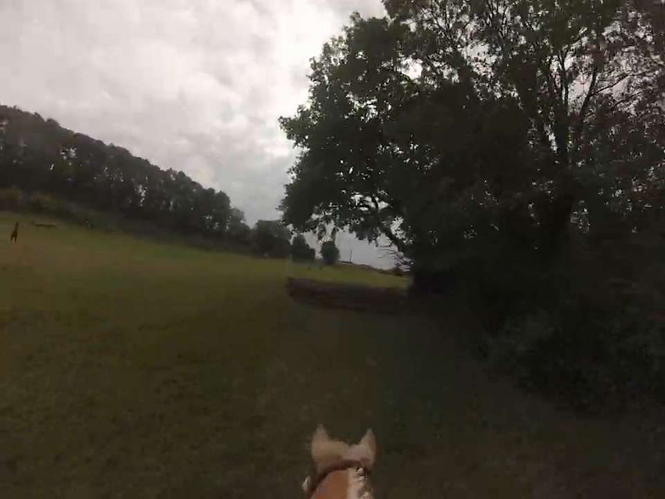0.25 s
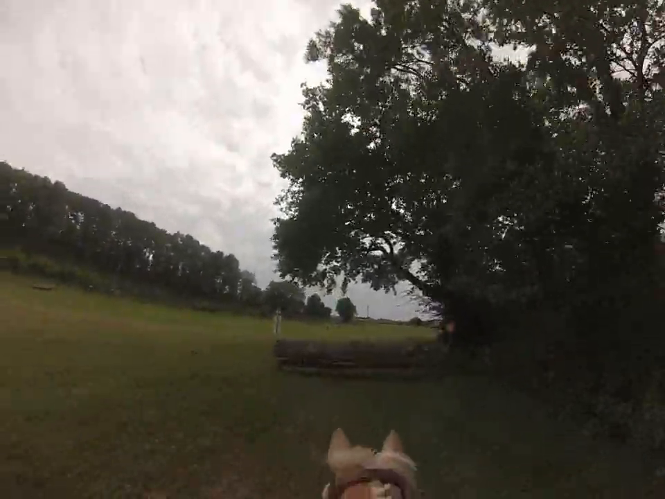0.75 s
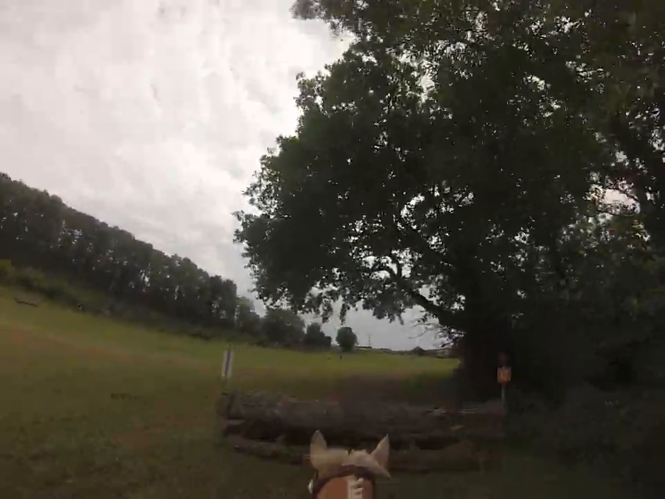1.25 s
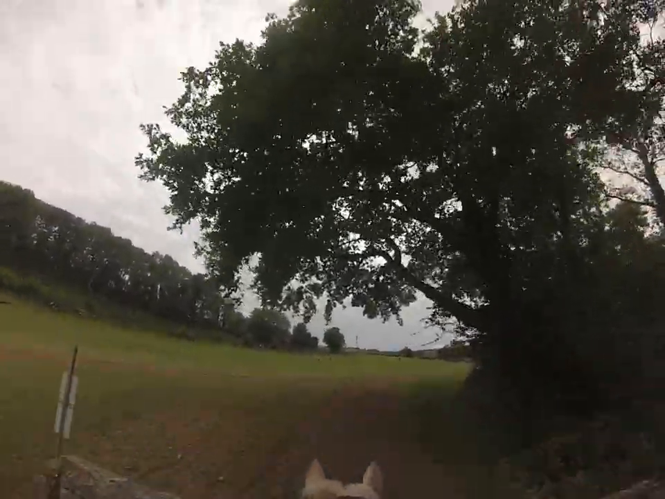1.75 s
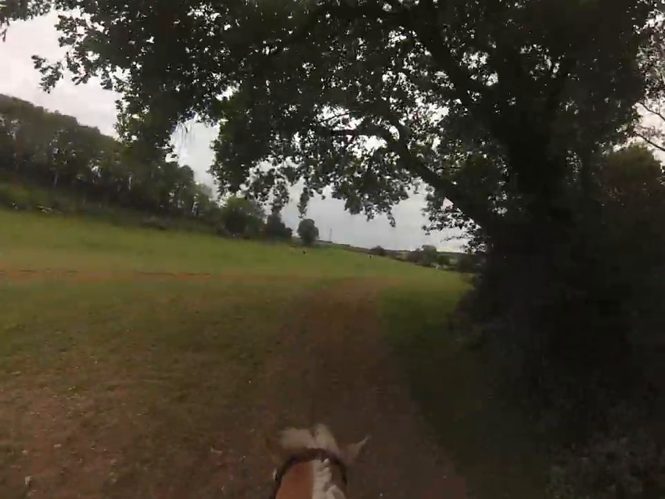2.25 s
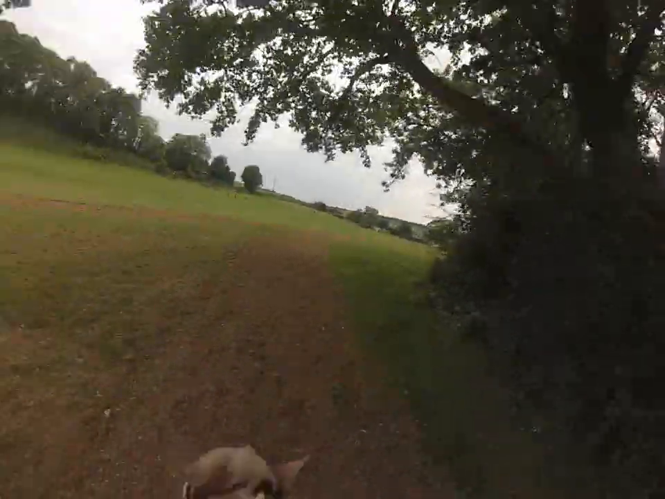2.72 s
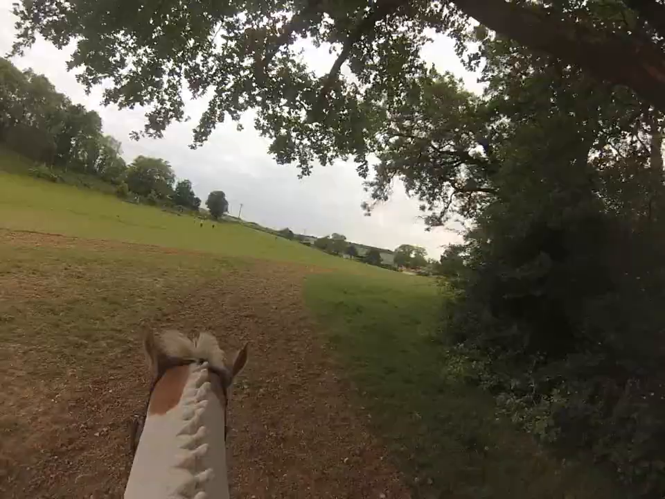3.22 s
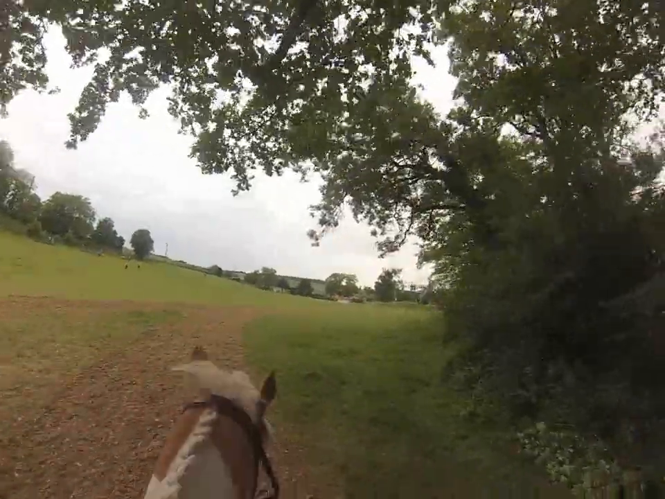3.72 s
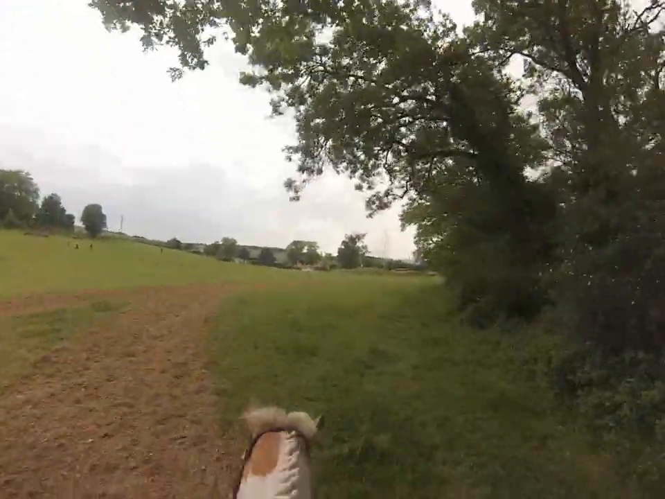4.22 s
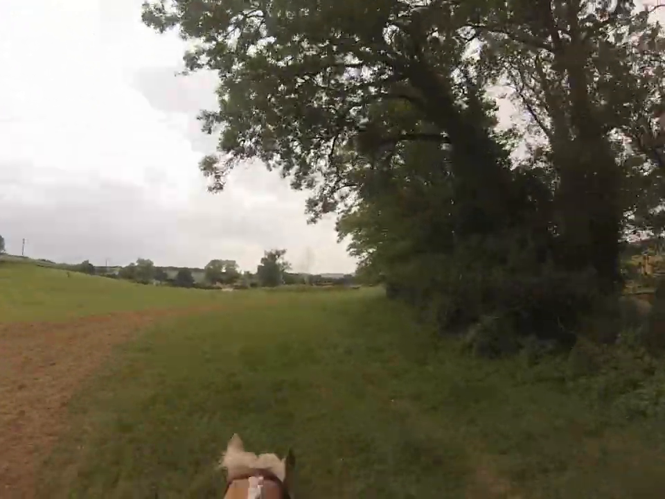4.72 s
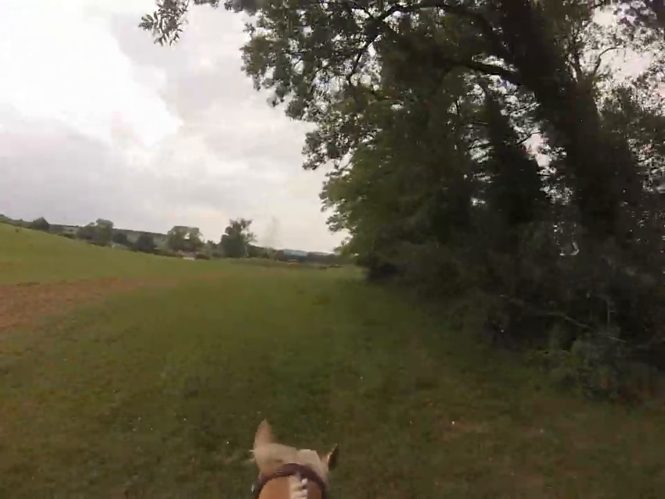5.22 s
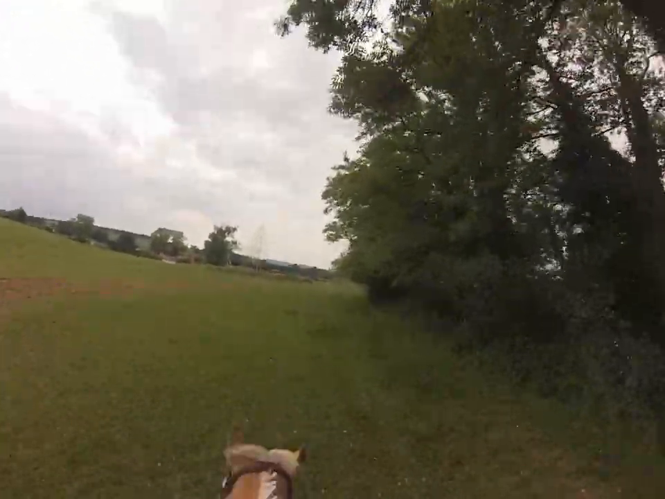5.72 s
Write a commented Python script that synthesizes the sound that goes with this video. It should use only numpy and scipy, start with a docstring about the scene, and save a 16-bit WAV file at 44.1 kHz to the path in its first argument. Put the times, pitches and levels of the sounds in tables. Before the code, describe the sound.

A horse jumps and gallops on over turf: dull uneven thuds, tack ticks, deep wobbling rumble and boxy wind noise, heard from a helmet camera.

```python
"""Turf with a log to jump: a galloping horse, heard from a small closed camera worn on the rider's helmet.
The mount wobbles as one low wandering tone, and wind buffets and roars as noise in two housing colours.
Dull thuds are damped tones with a crunch of small shocks; knocks on the helmet ring the housing modes.
Tack ticks as bright snaps and squeaks twice by stick and slip; the housing briefly whistles.
The microphone dulls the top and the recorder lays a faint hiss under everything."""
import sys
import numpy as np
from scipy import signal
from scipy.fft import rfft, irfft
from scipy.io import wavfile

SR = 44100
rng = np.random.default_rng(int(sys.argv[2]) if len(sys.argv) > 2 else 0)


def generate_wav(signal):
    """Clip the signal to [-1, 1] and save it as 16-bit WAV at the path in sys.argv[1]."""
    frames = np.transpose(np.atleast_2d(signal))
    scaled = np.clip(frames, -1, 1) * 32767
    pcm = np.round(scaled).astype(np.int16)
    wavfile.write(sys.argv[1], SR, pcm)


N = 262832

# swing of the camera mount between jolts: (time [s], level [dB], pitch [Hz])
MOUNT_SWING = [(0.0, -42.5, 46.8), (0.35, -46.5, 43.6), (0.64, -44.5, 45.16), (0.8, -45, 38.14),
               (1.08, -50.5, 39.2), (1.38, -46.5, 39.47), (1.6, -41, 38.8), (1.82, -40.5, 40.3),
               (2.05, -43, 33.67), (2.38, -52.5, 34.22), (2.65, -41.5, 33.34), (2.9, -39.5, 41.17),
               (3.15, -59, 42.87), (3.42, -47, 40.45), (3.85, -46, 36.07), (4.1, -46.5, 35.97),
               (4.45, -50, 41.6), (4.7, -42.5, 44.5), (5.05, -51, 33.8), (5.4, -50, 42.45),
               (5.65, -55, 42.7), (5.96, -51, 43)]
# jolts that set the mount ringing: (time of peak [s], peak level [dB], rise [s])
MOUNT_JOLTS = [(0.1, -57, 0.038), (0.33, -43.5, 0.017), (0.46, -49, 0.023), (0.75, -42.5, 0.037),
               (0.82, -46, 0.016), (0.9, -37, .02), (0.955, -41.5, .025), (1.28, -43.5, 0.038),
               (1.41, -34, .03), (1.71, -47, .025), (1.79, -34, 0.032), (1.87, -45, 0.038),
               (1.962, -33.5, 0.0083), (2.17, -39.5, 0.027), (2.46, -52, 0.013), (2.6, -39, 0.023),
               (2.69, -35, 0.019), (2.785, -24, 0.017), (3.019, -37.5, 0.049), (3.32, -37, 0.073),
               (3.5, -34, 0.016), (3.66, -35, 0.012), (3.73, -37, .02), (3.83, -37, 0.047),
               (3.919, -37, 0.016), (4.14, -42.5, 0.018), (4.243, -20, 0.017), (4.35, -17, 0.016),
               (4.44, -39.5, 0.018), (4.6, -70, 0.023), (4.89, -38.5, 0.029), (5.392, -31.5, 0.029),
               (5.69, -49, 0.021), (5.839, -41.5, 0.019)]
# colour of the irregular sway of the mount: (frequency [Hz], level [dB])
SWAY_COLOUR = [(8, -23), (16, 20.5), (30, 5.5), (55, -7.0), (90, -77), (200, -120)]
# wind on the housing, before its flutter: (time [s], buffeting level [dB], roar level [dB])
WIND_LEVELS = [(0.0, -49, -57), (0.2, -56, -59.5), (0.63, -55.5, -56), (1.0, -61.5, -67),
               (1.12, -57.5, -57.5), (1.27, -58.5, -60), (1.52, -58.5, -63.5), (1.8, -59, -59),
               (2.0, -58.5, -64), (2.14, -57.5, -61.5), (2.33, -59, -67), (2.45, -49.5, -59),
               (2.72, -51.5, -57.5), (2.88, -59.5, -68), (3.15, -57.5, -65.5), (3.33, -57.5, -64),
               (3.48, -55.5, -70), (3.62, -55, -59), (3.82, -57, -57.5), (3.97, -53, -60.5),
               (4.18, -53, -52.5), (4.3, -54.5, -60), (4.62, -52, -52.5), (4.95, -52, -57), (5.1, -49, -54),
               (5.3, -53, -55.5), (5.52, -48, -53), (5.96, -49.5, -53.5)]
# colour of the buffeting, below the dip of the housing: (frequency [Hz], relative level [dB per Hz])
BUFFET_COLOUR = [(10, -8.5), (45, 2.5), (75, -1.5), (110, -2), (165, 2), (230, -5), (320, -10.5),
                 (450, -15.5), (600, -18.5), (770, -14), (900, -23), (1050, -64), (1300, -115),
                 (3000, -130)]
# colour of the roar, above the dip: (frequency [Hz], relative level [dB per Hz])
ROAR_COLOUR = [(600, -22), (1050, -16.5), (1280, -8.5), (1420, 0), (1650, -5), (2100, -5.5), (2500, -8.5),
               (2900, -20), (3100, -18.5), (3600, -25), (3850, -23), (5000, -27.5), (5600, -31.5),
               (8000, -39.5), (12000, -46)]
# colour of the recorder's hiss: (frequency [Hz], relative level [dB per Hz])
HISS_COLOUR = [(500, 1.5), (3000, -16.5), (8000, -18.5), (12400, -21), (12900, -26), (15000, -51)]
# response of the microphone: (frequency [Hz], level [dB])
MICROPHONE_RESPONSE = [(20, -3.5), (11000, -3), (13000, -9.5), (15000, -13)]
# hoofbeats and jolts of the stride: (time [s], level [dB], thud pitch [Hz], crunch length [s],
# crunch level against the thud [dB], upper housing modes against the lower [dB])
BLOWS = [(0.253, -41.5, 227, 0.019, 2.5, -9), (0.287, -43, 435, 0.015, 4, -12.5),
         (1.578, -49, 169, 0.028, -10, 1.5), (1.621, -42.5, 168, 0.037, -19, -13),
         (1.755, -52, 169.2, 0.018, 0.5, -9), (1.826, -40, 111, 0.037, -11, -2),
         (2.041, -45, 143.3, 0.057, -7.5, -10), (2.36, -44.5, 219, 0.043, -9, -13),
         (2.484, -41, 175, 0.023, -20, 0), (2.55, -43.5, 204, 0.027, -0.5, -4.5),
         (2.63, -38.5, 104.7, 0.022, -1, -5), (2.639, -35, 356.4, 0.022, -4.5, -6),
         (2.662, -38.5, 106, 0.0095, -21, -10), (2.987, -44.5, 189.5, 0.02, -10, -14),
         (3.19, -41, 188, 0.027, -8.5, -10), (3.296, -46.5, 125.4, 0.034, -2.5, -1.5),
         (3.349, -33.5, 172, 0.042, -9, -7.5), (3.393, -30, 99.5, 0.035, -9, -3),
         (3.42, -36.5, 162, 0.016, -3.5, -3), (3.431, -33.5, 137, 0.0076, -28, -16),
         (3.44, -53, 171.6, .012, -7, 13), (3.647, -36, 168, 0.031, -3.5, -8.5),
         (3.707, -33, 159, 0.022, -6.5, -3), (3.726, -32.5, 185, 0.028, -14.5, -5),
         (3.752, -38.5, 107, 0.037, -10.5, -1), (4.099, -30, 158, 0.025, -10, 0),
         (4.128, -51, 176.7, 0.012, -3, 3), (4.192, -52, 306, 0.011, -2, 8),
         (4.63, -39, 162.4, 0.02, -21, 8), (4.876, -45, 171, 0.017, 2, -10),
         (4.896, -36.5, 178.7, 0.0096, -9.5, -5), (5.06, -46.5, 163, 0.016, -11, 1),
         (5.195, -38.5, 169.6, 0.017, -21, -7), (5.37, -49.5, 172, 0.027, -2, -5),
         (5.469, -41, 123.2, 0.023, -10, -17), (5.823, -35, 142.6, 0.025, -6.5, -11),
         (5.897, -50, 140.4, 0.046, -20, -10)]
# further rings of every thud: (frequency [Hz], level against the first [dB])
THUD_UPPER_RINGS = [(345, -18.5), (450, -15.5), (545, -17.5)]
# modes of the camera housing: (frequency [Hz], width [Hz], level [dB])
HOUSING_MODES = [(169, 99, -1), (359, 145, -23), (442, 69, -1.5), (526, 290, -8.5), (787, 28, -8),
                 (1390, 46, -10.5), (1641, 97, 3.5), (2090, 280, -7), (2670, 700, -17), (3140, 260, -16.5),
                 (3760, 89, -17.5), (4990, 57, -19), (6740, 250, -37)]
# ticks of buckles and straps: (time [s], peak level [dB], centre [Hz], spread [octaves])
TACK_TICKS = [(0.6453, -48.5, 9300, 0.63), (0.7435, -53, 4300, 0.34), (0.776, -44, 10000, 0.42),
              (2.0732, -51, 9600, 0.55), (2.4513, -48, 5240, 0.47), (2.6743, -52, 6960, 0.6),
              (2.7352, -53, 6620, 0.74), (2.7689, -33.5, 9500, 1.4), (3.3746, -34, 9000, 0.65),
              (3.4397, -45, 8340, .72), (3.7727, -52.5, 7640, 0.73), (3.8407, -56, 6600, 1),
              (3.8616, -33.5, 10150, 1.1), (3.8885, -53, 8220, 1), (3.9188, -54, 6910, 0.83),
              (3.9231, -58, 6540, 1), (3.9269, -53, 7260, .9), (3.9332, -45, 7440, 1.3),
              (3.9969, -39, 7070, 1.27), (4.1608, -54, 7040, .9), (4.166, -50, 3397, 0.21),
              (4.2193, -38.5, 9100, 1.1), (4.3799, -41, 7730, .95), (4.7865, -58, 9750, .9),
              (5.3515, -53, 8010, 0.98), (5.5079, -60, 7080, 0.8)]
# sharp knocks on the helmet and mount:
# (time [s], push level [dB], push length [s], housing ring against the push [dB])
HELMET_KNOCKS = [(0.745, -45.5, 0.000075, -6), (1.437, -60, 0.00018, 12), (1.76, -39.5, 0.00031, -17),
                 (1.921, -50.5, 0.00017, 8), (1.98, -47.5, 0.00028, -6), (2.134, -43.5, 0.00028, -1),
                 (2.451, -46, 0.00019, -3), (2.73, -54, 0.000088, 5), (2.877, -50.5, 0.00008, 1),
                 (3.299, -54, .0002, 1), (3.425, -22.5, 0.00071, -4), (3.648, -28.5, 0.0013, -31),
                 (4.341, -34.5, 0.00019, -5.5)]
# brief faint whistles of the housing: (time of peak [s], peak level [dB], pitch [Hz], length [s])
HOUSING_WHISTLES = [(1.797, -53.5, 1600, 0.0083), (1.854, -48, 1720, 0.005), (4.111, -36, 1560, 0.0028)]
# squeaks of a strap, one list each: (time [s], level [dB], slip rate [Hz], roughness [0-1])
STRAP_SQUEAKS = [
    [(3.077, -64, 4400, .8), (3.086, -53, 4300, .75), (3.095, -50, 3900, .6), (3.106, -54, 2800, .65),
     (3.116, -55, 1700, .55), (3.131, -67, 1150, .5)],
    [(4.928, -66, 4400, .1), (4.9315, -57, 3950, .1), (4.938, -61, 3750, .1), (4.941, -57, 3300, .1),
     (4.945, -53, 3120, .1), (4.95, -56, 2980, .1), (4.956, -58, 2250, .15), (4.96, -64, 2000, .2)],
]
# overtones of the slips: (multiple of the slip rate, level [dB])
SLIP_OVERTONES = [(1, 8), (2, -7), (3, -10)]
# colour of the rasp of rough slips: (frequency [Hz], level [dB])
RASP_COLOUR = [(1000, -22), (1500, -3), (3000, 0), (4300, -2),
               (6000, -10), (8200, 4), (9800, -18), (13000, -12)]

SWING_LUMPS = 0.38  # unevenness of the swing, share of its size
JOLT_FALL = 1.08  # late in a jolt, time to ring down by 1/e, against the rise
# a blow shakes the housing in the wind: levels [dB] and length against its crunch
SHAKE_LOW_DB, SHAKE_HIGH_DB, SHAKE_STRETCH = 3.5, -4.5, 1.29
SHAKE_RISE_S, SHAKE_LEAD_S = 0.014, 0.0085  # softer than the crunch, and a little ahead
SPLIT_HZ = 1050  # dip between the lower and upper modes of the housing
TICK_S = 0.002  # time for the crackle to fall by 1/e on either side of the snap
HISS_DB, EDGE_HZ = -75.5, 15000  # recorder: hiss level before the band limit, and that limit


def gain_of(db):
    """Decibels to amplitude."""
    return 10 ** (np.asarray(db) / 20)


def evened(x):
    """Scales to rms 1."""
    return x / np.sqrt(np.mean(x ** 2) + 1e-20)


def columns(rows, t):
    """Every column after the time, read at the times t."""
    s, *values = np.transpose(rows)
    return [np.interp(t, s, v) for v in values]


def coloured(x, points):
    """Filters x by a (frequency [Hz], level [dB]) table, read along log frequency."""
    f, db = np.transpose(points)
    hz = np.fft.rfftfreq(len(x), 1 / SR)
    gain = gain_of(np.interp(np.log(hz + 1), np.log(f), db))
    return irfft(rfft(x) * gain, len(x))


def drift(hz, count=N):
    """Slow chance of rms 1, with changes up to about hz a second."""
    f = np.fft.rfftfreq(count, 1 / SR)
    lowpass = 1 / (1 + (f / hz) ** 4)
    return evened(irfft(rfft(rng.standard_normal(count)) * lowpass, count))


def add(mix, s, sound):
    """Mixes a sound in from time s."""
    part = mix[max(round(s * SR), 0):][:len(sound)]
    part += sound[:len(part)]


def wobble(unsteady_hz=4.85, sway=0.51):
    """The mount rings at one low wandering pitch, swelled by jolts; sway is the power share of slow noise."""
    t = np.arange(N) / SR
    db, hz = columns(MOUNT_SWING, t)
    swing = gain_of(db) * (1 + SWING_LUMPS * drift(11.7))
    jolts = np.zeros(N)
    for s, peak_db, rise in MOUNT_JOLTS:
        u = (t - s) / rise
        fall = np.hypot(1, u / JOLT_FALL) - 1
        jolt = gain_of(peak_db) * np.exp(-np.where(u < 0, u ** 2, fall))
        jolts = np.hypot(jolts, jolt)  # overlapping jolts add in power
    swing = swing + jolts
    turns = np.cumsum(hz + unsteady_hz * drift(19.4)) / SR
    ring = np.sqrt(2) * np.sin(2 * np.pi * turns)
    slow = evened(coloured(rng.standard_normal(N), SWAY_COLOUR))
    sway_size = np.minimum(swing, gain_of(-33))  # hard jolts feed the ring alone
    return np.sqrt(1 - sway) * swing * ring + np.sqrt(sway) * sway_size * slow


def turbulence():
    """Steady noise in the two colours of the housing."""
    low, high = rng.standard_normal((2, N))
    return evened(coloured(low, BUFFET_COLOUR)), evened(coloured(high, ROAR_COLOUR))


def crunches(stretch=1, rise_s=0.0038, lead_s=0):
    """Envelopes of the blows in the lower and upper modes: each holds, then stops quickly."""
    dull, bright = np.zeros(N), np.zeros(N)
    t = np.arange(SR // 6) / SR
    for s, db, _, length, crunch_db, upper_db in BLOWS:
        rise = 1 - np.exp(-t / rise_s)
        stop = np.exp(-(t / (stretch * length + lead_s)) ** 2)
        crunch = gain_of(db + crunch_db) * rise * stop
        add(dull, s - lead_s, crunch)
        add(bright, s - lead_s, crunch * gain_of(upper_db))
    return dull, bright


def wind():
    """Eddies flutter both colours together, each with lumps of its own; every blow adds a burst."""
    buffet_db, roar_db = columns(WIND_LEVELS, np.arange(N) / SR)
    dull, bright = crunches(SHAKE_STRETCH, SHAKE_RISE_S, SHAKE_LEAD_S)
    low = np.hypot(gain_of(buffet_db), gain_of(SHAKE_LOW_DB) * dull)
    high = np.hypot(gain_of(roar_db), gain_of(SHAKE_HIGH_DB) * bright)
    buffet, roar = turbulence()
    eddies = drift(61)
    # flutter in dB around a small trim
    low_flutter = gain_of(-1 + 1.88 * eddies + 0.48 * drift(25))
    high_flutter = gain_of(-2.5 + 0.82 * eddies + 0.5 * drift(130) + 1.0 * drift(12))
    return buffet * low * low_flutter + roar * high * high_flutter


def housing(x, upper=None):
    """Rings the damped modes of the housing, the upper ones from their own drive if given."""
    t = np.arange(2048) / SR
    modes = []
    for k, (hz, width, db) in enumerate(HOUSING_MODES):
        sign = (-1) ** k  # neighbours alternate
        decay = np.exp(-np.pi * width * t)
        modes.append(sign * gain_of(db) * width * decay * np.sin(2 * np.pi * hz * t))
    modes = np.array(modes)
    modes = modes / abs(modes.sum(axis=0)).max()
    high = np.array(HOUSING_MODES)[:, 0] > SPLIT_HZ
    upper = x if upper is None else upper
    low_ring = signal.oaconvolve(x, modes[~high].sum(axis=0))
    high_ring = signal.oaconvolve(upper, modes[high].sum(axis=0))
    return (low_ring + high_ring)[:len(x)]


def thuds(t60=0.14, grains_per_s=3000, spread_db=2.5):
    """Each blow is a few quickly damped rings and a clumpy crunch of small shocks through the housing."""
    ring, t = np.zeros(N), np.arange(SR // 8) / SR
    for s, db, hz, *_ in BLOWS:
        tones = np.sin(2 * np.pi * hz * t)
        for f, ring_db in THUD_UPPER_RINGS:
            tones = tones + gain_of(ring_db) * np.sin(2 * np.pi * f * t)
        onset = 1 - np.exp(-t / 0.0015)
        add(ring, s, gain_of(db - 60 * t / t60) * onset * tones)
    dull, bright = crunches()
    shocks = (rng.random(N) < grains_per_s / SR) * rng.standard_normal(N)
    grains = shocks * gain_of(spread_db * drift(63))
    return ring + housing(dull * grains, bright * grains) / np.std(housing(grains))


def ticks(snap=9):
    """One bright snap inside a very short crackle, broad around its centre."""
    out, t, hz = np.zeros(N), np.arange(-256, 768) / SR, np.fft.rfftfreq(1024, 1 / SR)
    noise = rng.standard_normal((len(TACK_TICKS), 1024)) ** 3 / 4  # cubing makes it spiky
    for (s, db, centre_hz, octaves), crackle in zip(TACK_TICKS, noise):
        late = t - .001
        z = crackle * np.exp(-(late / TICK_S) ** 2) + snap * np.exp(-(late * SR) ** 2)
        band = np.exp(-.5 * (np.log2((hz + 1) / centre_hz) / octaves) ** 2)
        z = irfft(rfft(z) * band)
        add(out, s + t[0], gain_of(db) * z / abs(z).max())
    return out


def knocks():
    """One rounded push of the microphone with a slower rebound; its edge rings the housing."""
    push, click = np.zeros(N), np.zeros(N)
    for s, db, length, ring_db in HELMET_KNOCKS:
        u = np.arange(SR // 40) / SR / max(length, .00008) - 3  # in push lengths from its peak
        rebound = 0.43 * np.exp(-((u - 3.5) / 1.74) ** 2) * (u > -1.5)
        add(push, s, gain_of(db) * (np.exp(-u ** 2) - rebound))
        add(click, s + 3 * length, gain_of(db + ring_db) * signal.windows.hann(9) / 4)
    return push + housing(click)


def whistles():
    """Short swells of one pitch."""
    out, t = np.zeros(N), np.arange(-SR // 40, SR // 40) / SR
    for s, db, hz, length in HOUSING_WHISTLES:
        swell = np.exp(-(t / length) ** 2)
        add(out, s + t[0], gain_of(db) * swell * np.sin(2 * np.pi * hz * t))
    return out


def squeak(rows):
    """Stick and slip at a falling rate; rough slips smear the overtones into a rasp."""
    t = np.arange(rows[0][0], rows[-1][0], 1 / SR)
    db, hz, rough = columns(rows, t)
    jitter = 1 + 0.35 * rough * drift(956, count=len(t))
    turns = np.cumsum(hz * jitter) / SR
    slips = sum(gain_of(d) * np.sin(2 * np.pi * k * turns) for k, d in SLIP_OVERTONES)
    unsteady = gain_of(11.0 * rough * drift(164.7, count=len(t)))
    rasp = coloured(rng.standard_normal(len(t)), RASP_COLOUR)
    sound = (1 - rough) * evened(slips) * unsteady + 0.75 * rough * evened(rasp)
    return rows[0][0], gain_of(db) * sound * signal.windows.tukey(len(t), .06)


def scene():
    """All sources reach one microphone."""
    tack = ticks()
    for rows in STRAP_SQUEAKS:
        add(tack, *squeak(rows))
    return (wobble() + wind() + thuds() + knocks() + whistles() + tack)[None]


def record(dry):
    """The microphone dulls the top, the recorder adds its hiss; then the band limit."""
    hiss = gain_of(HISS_DB) * evened(coloured(rng.standard_normal(N), HISS_COLOUR))
    taken = coloured(dry[0], MICROPHONE_RESPONSE) + hiss
    band_limit = signal.firwin(511, EDGE_HZ, window=("kaiser", 9), fs=SR)
    return signal.oaconvolve(taken, band_limit, "same")[None]


dry = scene()
out = record(dry)
generate_wav(out)
```